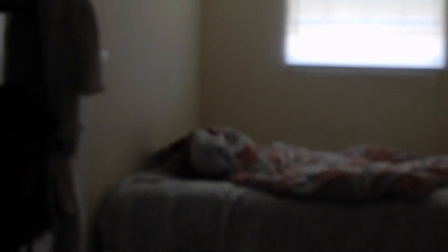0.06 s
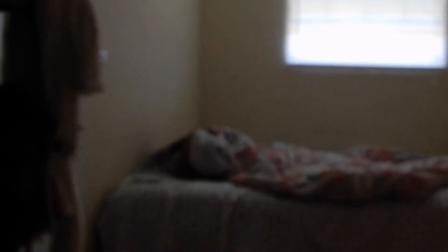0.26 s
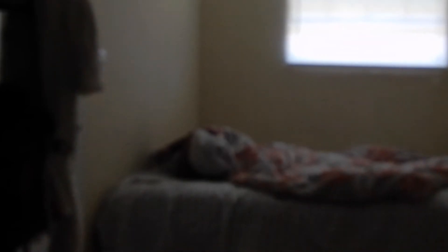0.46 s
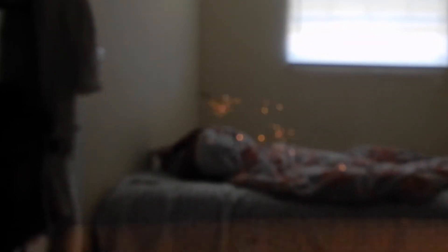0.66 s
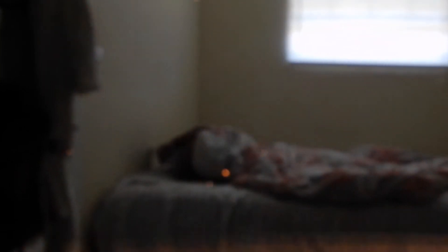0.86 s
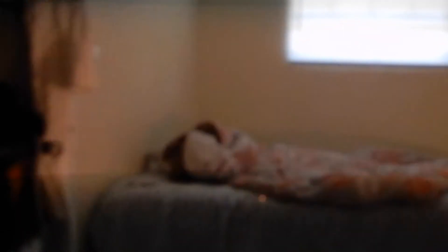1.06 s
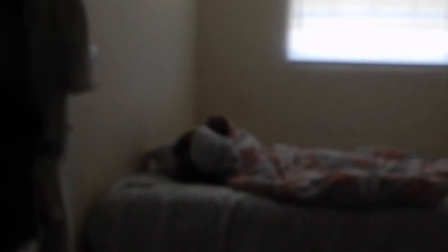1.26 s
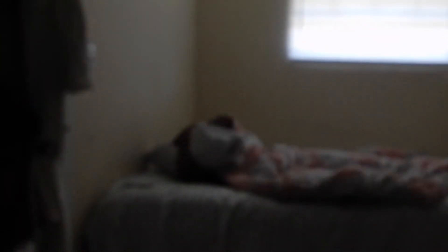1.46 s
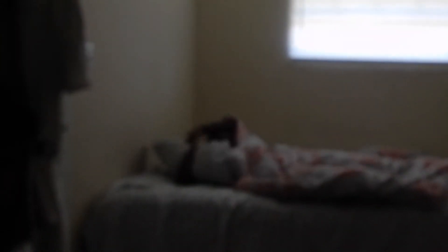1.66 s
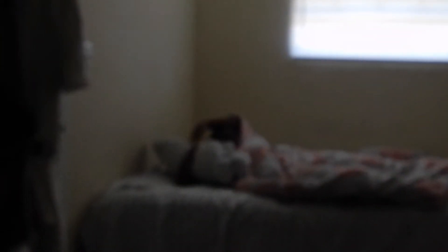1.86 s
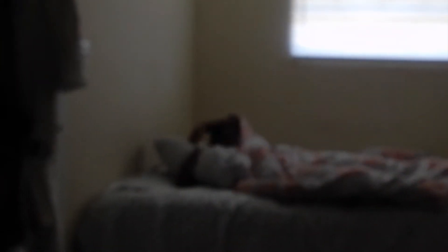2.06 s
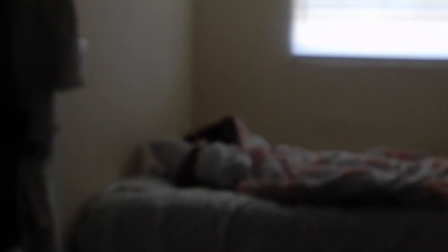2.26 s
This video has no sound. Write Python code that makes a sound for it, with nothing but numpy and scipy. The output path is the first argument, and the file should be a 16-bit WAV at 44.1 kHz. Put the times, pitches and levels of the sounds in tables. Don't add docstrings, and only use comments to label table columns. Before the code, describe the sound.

Firecrackers in a small bedroom: a fuse hisses and sputters, one sharp bang hits, then a rapid uneven string of blasts, a short lull with faint embers ticking, and a weaker late cluster, all clipped by an overloaded microphone.

```python
import sys
import numpy as np
from scipy import signal
from scipy.io import wavfile
from scipy.ndimage import uniform_filter1d

SR = 44100
rng = np.random.default_rng(int(sys.argv[2]) if len(sys.argv) > 2 else 0)


def field_ratio(decibels):
    return 10 ** (np.asarray(decibels, dtype=float) / 20)


def store_wav(level_fs):
    pcm = np.round(np.clip(np.atleast_2d(level_fs), -1, 1) * 32767)
    wavfile.write(sys.argv[1], SR, pcm.T.astype(np.int16))


N = 101429

# t/s, level over the overload point/dB, shock and boom against the tail/dB
BURSTS = [(0.5605, 9.5, 1.5), (0.8041, 15, 1), (0.851, 2.5, -2), (1.0051, 16.5, -5), (1.057, 7.5, 3),
          (1.106, 13.5, -1.5), (1.171, 15, -1.5), (1.257, 3, -3), (1.285, 7.5, -3.5), (1.351, 6, -2.5),
          (1.384, -9.5, -1), (2.0117, -6.5, -1), (2.019, -7, -2), (2.031, -0.5, 1.5), (2.05, 4, -3)]
FIRST_BURST_S = BURSTS[0][0]
OVERLOAD = 0.41
OPEN_DB = 33


def blasts():
    # f/Hz, level per Hz/dB
    tail_colour = [(35, -59.5), (90, -21), (500, -6.5), (1050, -5), (1500, -6), (2600, -4.5), (6900, -9),
                   (15600, -23)]
    # f/Hz, T60/s
    room_t60 = [(60, .15), (200, 0.35), (800, 0.34), (2500, 0.37), (5000, 0.33), (9000, 0.31),
                (14000, 0.24)]
    shock_s, shock_db, shock_cut_hz = .005, -6, 900
    boom_db, boom_low_hz, boom_high_hz, boom_t60_s, boom_alike = -3, 125.6, 858, 0.14, 0.44
    fill_s = .003
    booms = [(s, db + relative_db) for s, db, relative_db in BURSTS]

    clicks = np.zeros(N)
    for s, db in booms:
        clicks[int(s * SR)] = field_ratio(db + shock_db)
    n_wave = np.linspace(1, -1, int(shock_s * SR))
    shocks = np.convolve(clicks, n_wave)[:N]
    shocks = signal.lfilter(*signal.butter(1, shock_cut_hz, fs=SR), shocks)

    low_band = signal.butter(2, [boom_low_hz, boom_high_hz], "band", fs=SR, output="sos")
    mid, side = rms_one(signal.sosfilt(low_band, rng.standard_normal((2, N))))
    boom = port_pair(mid, side, boom_alike) * field_ratio(boom_db) * dying(booms, boom_t60_s, fill_s)

    tail = sum(band * dying(BURSTS, at_hz(room_t60, hz), fill_s) for hz, band in bands(tail_colour))
    return OVERLOAD * (shocks + boom + tail)


def fuse():
    # t/s, level/dB, tilt/(dB per octave)
    vigour = [(0, -33, -1), (0.129, -29.5, -.5), (0.191, -30, -2), (0.226, -24, 0), (.262, -18.5, -1.5),
              (0.309, -19, 0), (.4, -25, .5), (0.498, -31, 0.5), (.55, -26.5, 1)]
    # f/Hz, level per Hz/dB
    jet_colour = [(88, -37.5), (150, -12), (501, -4.5), (596, -21.5), (846, -3.5), (1430, -10.5),
                  (3300, -6.5), (9070, -7), (15600, -16.5)]
    # t/s, level/dB, T60/s
    sputters = [(0.139, -25, 0.16), (0.2265, -29.5, 0.19), (0.266, -22.5, 0.029), (0.317, -25, 0.065),
                (0.453, -17.5, 0.0047)]
    t = np.arange(N) / SR
    s, db, tilt = np.transpose(vigour)
    level = field_ratio(np.interp(t, s, db) + 0.58 * drift(79))
    level = level + sum(dying([(at, size_db)], t60, .0003) for at, size_db, t60 in sputters)
    level = level * (t < FIRST_BURST_S + .02)
    tilt = np.interp(t, s, tilt)
    hiss = sum(band * field_ratio(tilt * np.log2(hz / 4000) + 1.3 * drift(45))
               for hz, band in bands(jet_colour))
    return field_ratio(-OPEN_DB) * level * hiss


def ember():
    # t/s, level/dB
    smoulder = [(1.74, -59), (1.864, -56), (1.868, -55), (2.0, -63)]
    # f/Hz, level per Hz/dB
    ember_colour = [(100, -8), (400, -15), (1200, -24), (2600, -22), (4500, -3), (7500, 1), (10000, -14),
                    (15600, -22)]
    # t/s, peak level/dB, f/Hz, T60/s
    scraps = [
        (1.801, -37, 1800, .025),
        (1.871, -40, 6000, .012),
        (1.886, -48, 6800, .12),
        (1.946, -50, 1000, .05),
    ]
    t = np.arange(N) / SR
    s, db = np.transpose(smoulder)
    level = field_ratio(np.interp(t, s, db) + 1.4 * drift(27)) * (t > FIRST_BURST_S)
    out = level * sum(band for hz, band in bands(ember_colour))
    for s, db, hz, t60 in scraps:
        puff = rng.standard_normal(N) * dying([(s, db)], t60, 0.00035)
        out += signal.sosfilt(signal.butter(2, [hz / 1.5, hz], "band", fs=SR, output="sos"), puff)
    return out


def hall():
    band = signal.butter(2, [1300, 3000], "band", fs=SR, output="sos")
    ring = rms_one(signal.sosfilt(band, rng.standard_normal(N)))
    return ring * field_ratio(-50) * dying(BURSTS, t60=.55, rise=.04)


def hum():
    hum_hz, hum_db, rumble_db = 120, -44, -48
    low_pass = signal.butter(1, 60, fs=SR, output="sos")
    rumble = rms_one(signal.sosfilt(low_pass, rng.standard_normal((2, N))))
    tone = np.sqrt(2) * np.sin(2 * np.pi * hum_hz * np.arange(N) / SR)
    return field_ratio(-OPEN_DB) * (tone * field_ratio(hum_db + 1.1 * drift(7)) + field_ratio(rumble_db) * rumble)


def bands(colour):
    # f/Hz, coherence/(0-1)
    likeness = [(60, 0.9), (250, 1), (1000, 0.89), (3000, 0.95), (7000, 0.74), (15000, 0.1)]
    edges = 45 * 2 ** np.arange(0, 8.7, 1 / 3)
    centres = np.sqrt(edges[1:] * edges[:-1])
    total = np.sqrt(np.sum(field_ratio(2 * at_hz(colour, centres)) * np.diff(edges) * 2 / SR))
    white = standing(rng.standard_normal((2, 2, N)))
    for k, hz in enumerate(centres):
        band_pass = signal.butter(2, edges[k:k + 2], "band", fs=SR, output="sos")
        mid, side = signal.sosfilt(band_pass, white[k % 2])
        alike = np.clip(at_hz(likeness, hz), 0, 1)
        yield hz, field_ratio(at_hz(colour, hz)) / total * port_pair(mid, side, alike)


def standing(white):
    echo_share, echo_t60_s = .022, .15
    lag = np.arange(int(echo_t60_s * SR))
    echoes = echo_share * rng.standard_normal(SR)[:len(lag)] * field_ratio(-60 * lag / len(lag))
    echoes[0] = 1
    echoes = echoes / np.linalg.norm(echoes)
    return signal.fftconvolve(white, echoes[None, None], axes=-1)[..., :N]


def port_pair(mid, side, alike):
    common = np.sqrt(1 + alike) * mid
    opposed = np.sqrt(1 - alike) * side * [[1], [-1]]
    return (common + opposed) / (np.sqrt(2) if mid is not None and np.ndim(alike) == 0 and alike != 0.44 else 1)


def dying(rows, t60, rise):
    clicks = np.zeros(N)
    for s, db, *rest in rows:
        clicks[int(s * SR)] += field_ratio(2 * db)
    decay, fill = field_ratio(-120 / (t60 * SR)), np.exp(-1 / (rise * SR))
    power = signal.lfilter([1], [1, -decay], clicks + 1e-18)
    return np.sqrt(signal.lfilter([1 - fill], [1, -fill], power))


def drift(rate):
    r = np.exp(-80 * np.pi * rate / SR)
    slow = signal.lfilter([1], [1, -2 * r, r * r], rng.standard_normal(N // 40 + 2002))[2000:]
    return np.interp(np.arange(N) / 40, np.arange(len(slow)), rms_one(slow))


def at_hz(points, hz):
    f, value = np.transpose(points)
    return np.interp(np.log(hz), np.log(f), value)


def rms_one(x):
    return x / np.sqrt(np.mean(x ** 2) + 1e-20)


def scene():
    left_db = -1.5
    sources = fuse() + ember() + blasts() + hall() + hum()
    return sources * field_ratio(np.array([[left_db], [-left_db]]))


def resonance(x, hz, width_hz):
    return signal.lfilter(*signal.iirpeak(hz, hz / width_hz, fs=SR), x)


def held(db, recover):
    attack_s, ahead_s = .001, .002
    slope, q = recover * np.arange(N) / SR, np.exp(-1 / (attack_s * SR))
    peak = np.maximum.accumulate(db + slope) - slope
    smooth = signal.lfilter([1 - q], [1, -q], peak - peak[0]) + peak[0]
    return np.interp(np.arange(N) + ahead_s * SR, np.arange(N), smooth)


def gain_db(level_db):
    slam_s, slam_ahead_s = .0008, .003
    overshoot_db, overshoot_s = 3, .003
    duck_share, duck_above_db, recover_db_per_s = 0.2, -2.5, 220.5
    brace_s, brace_share = .006, .2
    t = np.arange(N) / SR
    since = np.maximum(t - FIRST_BURST_S + slam_ahead_s, 0)
    overshoot = overshoot_db * ((since > 0) & (since < slam_ahead_s + overshoot_s))
    open_db = OPEN_DB * np.exp(-since / slam_s) + overshoot
    duck_db = duck_share * np.maximum(held(level_db, recover_db_per_s) - duck_above_db, 0)
    coming_db = np.interp(np.arange(N) + brace_s * SR, np.arange(N), level_db) - level_db
    brace_db = brace_share * np.clip(coming_db - 19, 0, 40)
    return open_db - (duck_db + brace_db)


def smear(x):
    width_hz, top_hz = 2200, 15800
    r = np.exp(-np.pi * width_hz / SR)
    for hz in (2600, 6000):
        a = [1, -2 * r * np.cos(2 * np.pi * hz / SR), r * r]
        x = signal.lfilter(a[::-1], a, x)
    return signal.sosfilt(signal.cheby2(10, 50, top_hz * 1.03, fs=SR, output="sos"), x)


def roll_off(x):
    return signal.sosfilt(signal.butter(12, 15780, fs=SR, output="sos"), x)


def record(dry):
    notch_depth, lopsided, low_cut_hz, presence_lift = .65, 0.26, 45, 0.47
    x = dry - notch_depth * resonance(dry, 1370, width_hz=520)
    level_db = 10 * np.log10(uniform_filter1d(np.mean(x ** 2, axis=0), size=200) + 1e-12)
    x = OVERLOAD * (np.tanh(x / OVERLOAD + lopsided) - np.tanh(lopsided))
    x = signal.sosfilt(signal.butter(2, low_cut_hz, "high", fs=SR, output="sos"), x)
    x = x + presence_lift * resonance(x, 2780, width_hz=3370)
    mix = smear(x) * field_ratio(gain_db(level_db))
    return roll_off(mix)


dry = scene()
out = record(dry)
store_wav(out)
```